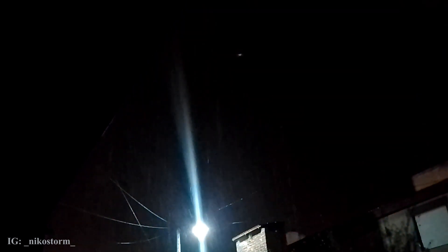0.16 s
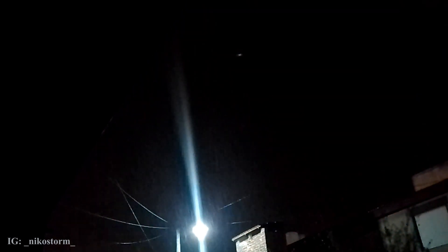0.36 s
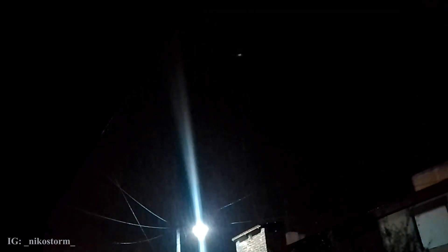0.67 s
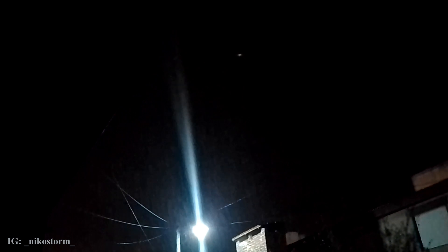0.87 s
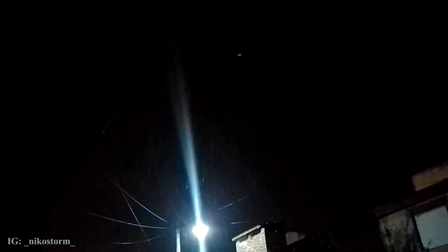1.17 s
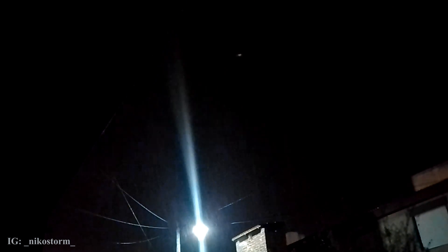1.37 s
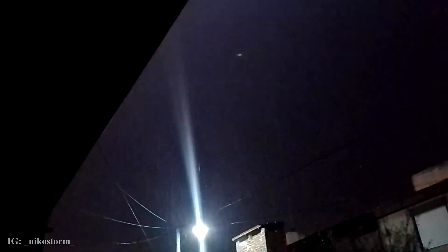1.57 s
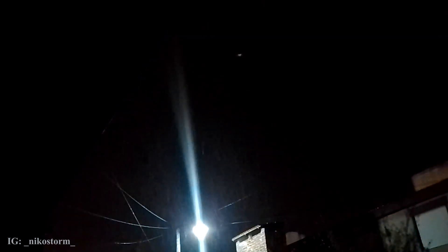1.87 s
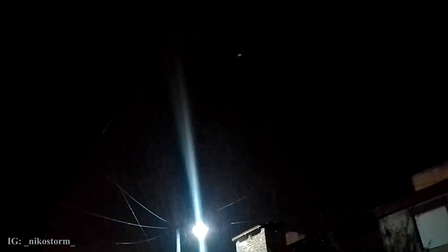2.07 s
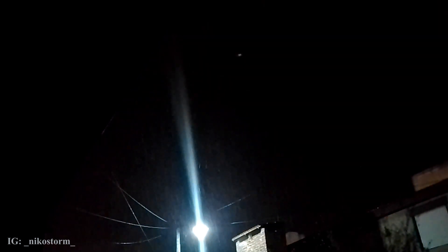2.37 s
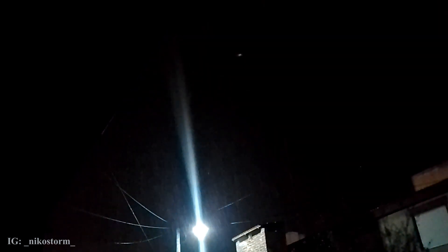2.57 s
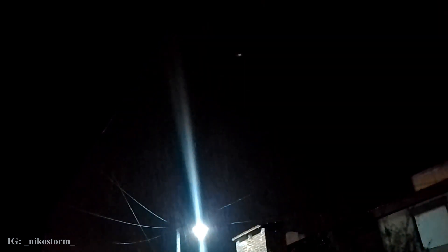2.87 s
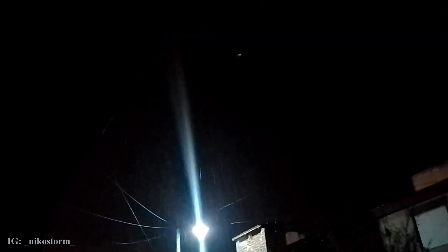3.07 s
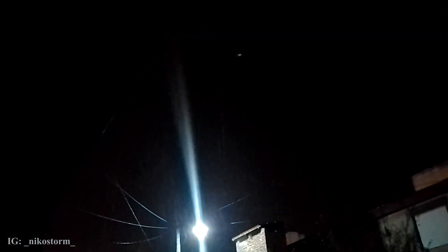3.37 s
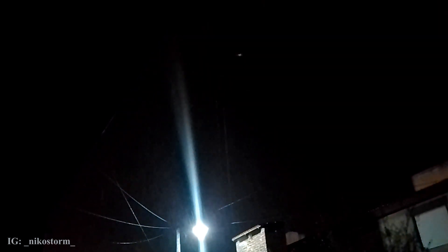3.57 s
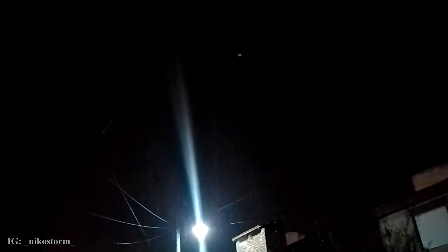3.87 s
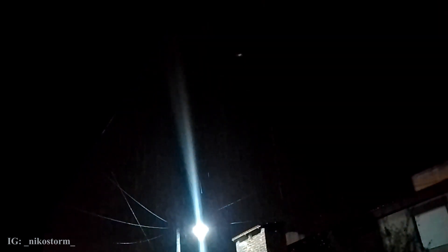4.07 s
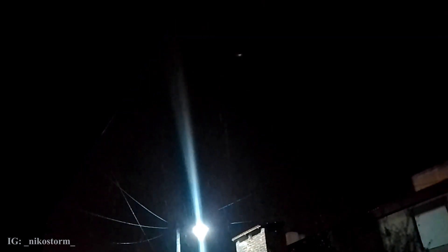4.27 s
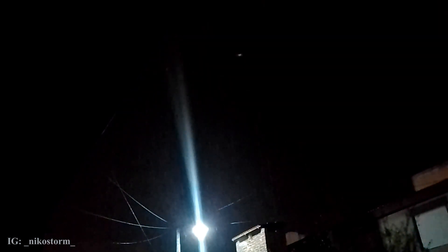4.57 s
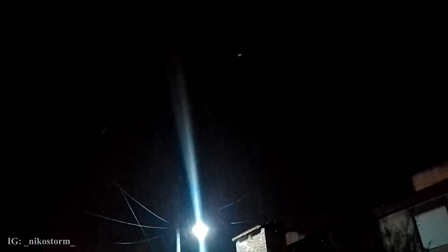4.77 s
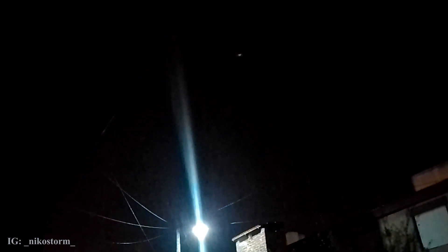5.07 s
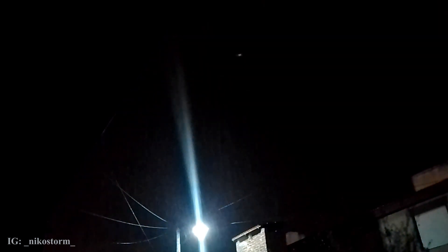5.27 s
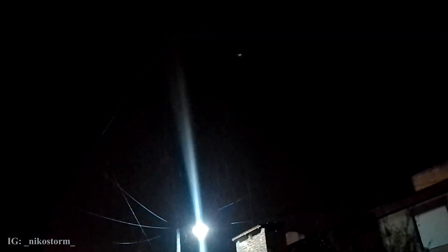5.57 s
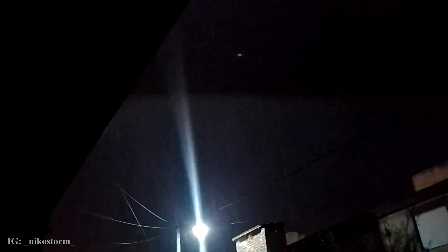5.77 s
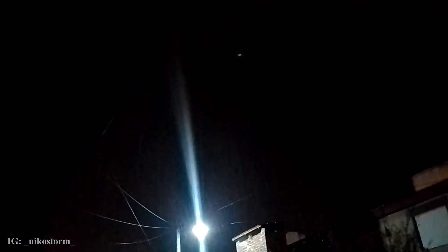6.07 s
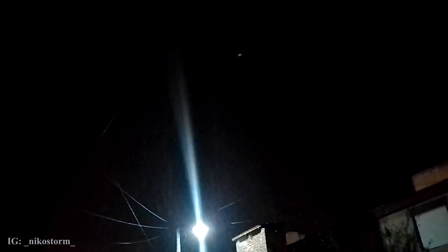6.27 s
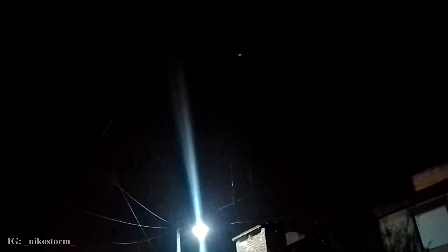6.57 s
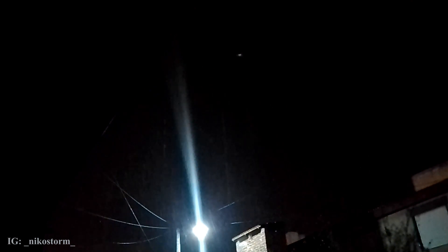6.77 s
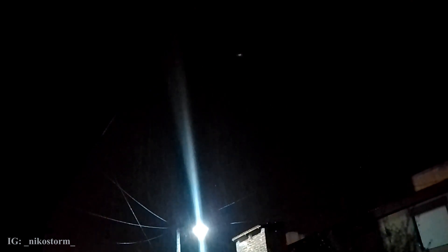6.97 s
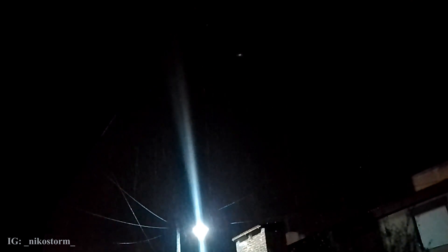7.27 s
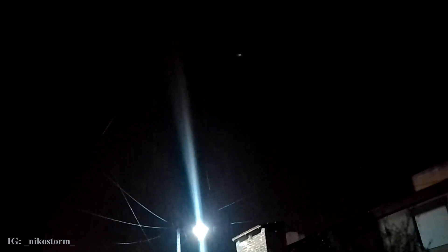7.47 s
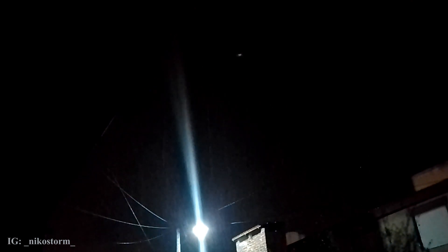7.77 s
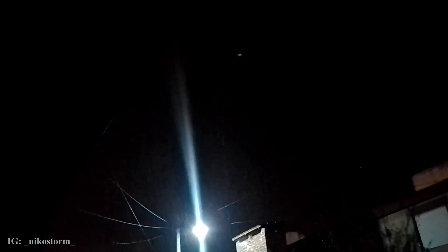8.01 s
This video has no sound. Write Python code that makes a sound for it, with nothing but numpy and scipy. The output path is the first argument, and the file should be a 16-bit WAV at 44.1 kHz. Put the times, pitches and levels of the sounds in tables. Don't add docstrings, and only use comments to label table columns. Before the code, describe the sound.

Heavy night rain between buildings. A low, dull, steady roar of distant rainfall lies under close drops that tap hollow, hard and metal surfaces. The first half second is loud and crowded with cracks, then a sudden change leaves softer rain and a thin high insect note. Patter thickens again from about four seconds and stays busy and uneven. Nearby walls add short slaps to the drops; a small microphone sits close to them under a roof edge.

```python
import sys
import numpy as np
from scipy import signal
from scipy.io import wavfile
from scipy.ndimage import uniform_filter1d

SR = 44100
rng = np.random.default_rng(int(sys.argv[2]) if len(sys.argv) > 2 else 0)


def voltage_ratio(decibels):
    exponent = np.asarray(decibels, float) / 20
    return 10 ** exponent


def pcm_store(signal):
    levels = np.round(np.clip(np.atleast_2d(signal), -1, 1) * 32767)
    wavfile.write(sys.argv[1], SR, levels.astype(np.int16).T)


N = 358974
FIRST_CHANGE_S = 0.465

# (time [s], peak [dB], ring [Hz])
HOLLOW_DROPS = [(0.1078, -17.5, 4050), (0.144, -15.5, 3900), (0.193, -12.5, 5700), (0.2423, -18, 4100),
                (0.3487, -18, 3970), (0.389, -32, 4650), (0.4532, -15.5, 3450), (1.1914, -23.5, 3600),
                (2.484, -28, 4550), (3.936, -17, 5140), (4.0053, -19, 4030), (4.0611, -21, 3930),
                (4.5316, -26, 4100), (4.9437, -17, 5430), (5.166, -25.5, 3830), (5.8067, -27.5, 4180),
                (6.111, -20, 3580), (6.2312, -23.5, 4400), (6.4609, -22, 3600), (6.8503, -24, 4700),
                (6.9306, -27, 4730), (6.9671, -20, 4204), (6.9927, -27, 4500), (7.0206, -30, 3970),
                (7.0676, -14, 4220), (7.1585, -25.5, 4460), (7.6929, -23.5, 2980), (7.7563, -25, 3960),
                (7.8007, -19, 4300), (8.0441, -24.5, 3530),
                (0.3034, -31, 3710), (0.4994, -33, 4600), (4.489, -24, 9300), (4.645, -28, 8900),
              (7.328, -32, 8460), (7.693, -25, 4600), (0.525, -31, 4480), (1.3572, -28, 5400),
              (1.5833, -31.5, 4470), (1.743, -32.5, 3920), (2.004, -31.5, 4000), (2.1321, -32, 3160),
              (3.028, -30, 4500), (3.223, -31, 3360), (3.423, -33, 4250), (3.483, -35, 3600),
              (3.6972, -33, 3880), (3.891, -29.5, 4850), (3.9759, -32, 3870), (4.742, -32.5, 4000),
              (4.8212, -35, 4000), (5.188, -28.5, 4240), (5.4918, -32, 3980), (5.6503, -33, 4830),
              (5.859, -37, 4770), (5.9711, -30, 3700), (6.202, -29, 4800), (7.032, -26, 4230),
              (7.407, -31, 3600), (7.54, -34, 4205), (7.743, -26, 4500), (7.83, -29, 4250),
              (7.88, -27, 4600)]
# (time [s], peak [dB], ring [Hz])
HARD_DROPS = [(0.0415, -19, 7550), (0.1098, -8.5, 7900), (0.3361, -17.5, 7800), (2.133, -26, 7360),
              (2.6504, -28, 7350), (2.7316, -23, 8300), (3.029, -27, 7400), (3.46, -25.5, 7550),
              (3.9755, -20.5, 7050), (4.0592, -22, 7100), (4.1933, -13, 8300), (4.2795, -16.5, 8300),
              (4.8214, -25.5, 6960), (5.167, -23.5, 7780), (5.6512, -22, 8300), (5.7144, -22, 8200),
              (5.7998, -13.5, 8130), (5.859, -24, 8300), (6.0972, -25, 8100), (6.1282, -18.5, 7650),
              (6.2373, -19, 7585), (6.3647, -21.5, 7260), (6.4612, -22, 7460), (6.8503, -19.5, 8300),
              (6.931, -21.5, 7800), (6.9546, -23, 7500), (7.0369, -22, 8050), (7.7023, -26, 8500),
              (7.8018, -25, 7290), (7.88, -20.5, 7960)]
# (time [s], peak [dB], ring [Hz])
METAL_DROPS = [(0.0596, -20, 10000), (0.1405, -15.5, 9900), (0.21, -15, 9500), (1.131, -31, 10300),
               (1.1914, -20, 8550), (1.3493, -26, 9255), (1.6576, -30, 9800), (3.121, -29, 9000),
               (3.8262, -24, 8800), (3.936, -20, 8900), (4.0053, -23, 8800), (4.225, -40, 8500),
               (4.4367, -25, 9100), (4.4756, -21.5, 9150), (4.559, -26, 8650), (4.9439, -12, 8500),
               (5.6012, -22, 8500), (5.7655, -20.5, 8500), (5.914, -22, 9050), (5.9708, -17, 8750),
               (6.5106, -23.5, 8800), (6.5896, -22, 9110), (6.6298, -26, 9200), (6.69, -21.5, 8760),
               (7.0776, -23, 8300), (7.359, -24.5, 9500), (7.3956, -21, 9700), (7.443, -24, 9900),
               (7.597, -29, 10900), (8.074, -21.5, 9390)]
# (time [s], peak [dB], ring [Hz])
SMALL_HOLLOW_DROPS = [(0.0105, -23, 4300), (0.0256, -24, 4200), (0.1595, -24, 3750), (0.2049, -15, 3830),
                      (0.2114, -23, 5600), (0.2554, -15, 4670), (0.3052, -23, 3660), (0.3876, -23, 3960),
                      (0.3921, -17.5, 4540), (0.4378, -22, 3240), (0.8298, -29.5, 4610),
                      (0.9425, -32.5, 3940), (1.4994, -33, 5450), (1.8371, -32, 4800), (2.6387, -32, 5020),
                      (2.6457, -29, 4520), (2.6516, -31, 5940), (3.4155, -31, 3450), (3.4295, -28, 4590),
                      (3.6182, -33.5, 3900), (3.6621, -34.5, 3040), (3.8445, -28, 5990),
                      (3.9773, -26, 5990), (4.1149, -27, 3790), (4.1227, -35, 3470), (4.1497, -30, 4180),
                      (4.1909, -29, 5990), (4.2326, -33, 4690), (4.4909, -33, 4500), (4.5601, -28, 5810),
                      (4.8039, -31, 4940), (5.407, -32, 4630), (5.4466, -31, 5170), (5.4563, -35, 3810),
                      (5.5116, -33, 3600), (5.5411, -37, 2610), (5.5759, -38, 4130), (5.7016, -32, 5990),
                      (5.7193, -26, 5950), (5.8647, -29, 4780), (5.8723, -32, 3620), (5.9349, -31, 4820),
                      (6.0575, -36, 4130), (6.0738, -32, 3810), (6.0985, -23, 5940), (6.1075, -28, 4480),
                      (6.1744, -29, 3530), (6.2388, -24, 4454), (6.3852, -33, 5990), (6.5119, -35, 3730),
                      (6.5991, -30.5, 4090), (6.6855, -32, 5990), (6.778, -31, 3900), (6.8953, -31, 3810),
                      (6.9557, -28.5, 4630), (7.0804, -16.5, 4700), (7.3608, -34, 3680), (7.703, -24, 2540),
                      (7.8173, -30, 4500), (7.8274, -29, 3230), ]
# (time [s], peak [dB], ring [Hz])
SMALL_HARD_DROPS = [(0.0537, -26, 7560), (0.1343, -28, 7540), (0.1454, -14, 8380), (0.1498, -17, 9320),
                    (0.1545, -21, 8870), (0.1597, -14, 7390), (0.2069, -16, 7650), (0.3051, -21, 8250),
                    (0.3327, -17, 9580), (0.3447, -18, 9090), (0.3502, -11.5, 8160), (0.392, -22, 6930),
                    (0.438, -16, 9630), (0.455, -17.5, 7300), (1.1328, -26, 9750), (1.1666, -25, 9700),
                    (1.3575, -24, 9840), (2.485, -28, 6050), (2.8607, -26, 9580), (3.6977, -23.5, 8800),
                    (3.9447, -23, 9190), (4.0188, -23, 8940), (4.1228, -22, 8760), (4.1499, -22, 7490),
                    (4.1554, -28, 8700), (4.2905, -22, 7860), (4.2956, -18, 8200), (4.3048, -20, 8960),
                    (4.663, -26, 8660), (4.7283, -23.5, 9860), (4.7429, -28, 6800), (5.0465, -18.5, 8300),
                    (5.3191, -28, 8760), (5.5115, -23, 9000), (5.7762, -23, 8200), (5.8211, -19, 9190),
                    (5.8648, -20, 9040), (6.0741, -29, 7990), (6.1178, -19, 8440), (6.1381, -28, 7750),
                    (6.153, -20, 7300), (6.2148, -24, 7560), (6.4472, -26, 9780), (6.4814, -23, 8910),
                    (6.528, -25, 9780), (6.5965, -21, 8740), (6.8948, -26, 7770), (6.9731, -22, 8420),
                    (7.0064, -20, 9000), (7.0176, -26, 8500), (7.0327, -22, 8310), (7.1246, -22, 9630),
                    (7.1858, -22, 8100), (7.5272, -26, 9260), (7.6404, -25, 9390), (7.7493, -24.5, 7560),
                    (7.7577, -20, 8140), (7.8168, -25, 7470), (8.0456, -25, 10400), (8.0849, -19, 10230)]
# (time [s], peak [dB])
SPLASH_TICKS = [(0.1401, -30), (0.1865, -28), (1.1313, -29), (1.7429, -29), (1.8457, -36), (1.961, -31),
                (2.2044, -30), (2.376, -29.5), (2.7327, -28), (3.2121, -33), (3.3898, -31), (3.5489, -22),
                (3.827, -19), (4.0612, -22), (4.1834, -32), (4.4137, -23.5), (4.974, -21.5), (5.299, -29),
                (5.4927, -25.5), (5.6004, -21.5), (6.3869, -28), (6.6298, -27), (6.6847, -25), (6.967, -21),
                (7.442, -29), (7.597, -25), (7.6271, -24), (7.8007, -26), (7.8265, -19.5), (8.0722, -21)]
# (pitch [Hz], level [dB], t60 [s])
SHEET_RINGS = [
    (3870, -21.5, 0.034),
    (4430, -23, 0.026),
    (7150, -18, 0.022),
    (7720, -15, .035),
    (8300, -18.5, 0.026),
    (8930, -14.5, 0.053),
    (9300, -15, 0.054),
]
# (delay [s], level [dB])
WALL_ECHOES = [
    (.0022, -11),
    (.0049, -11.5),
    (.0072, -20),
    (0.012, -26),
]
# (time [s], strength [dB], lean toward the hard surface [dB])
PATTER_CURVE = [(0.47, 3, -0.5), (0.7, 0.5, 1), (1.3, 0.5, 0), (2.7, 0, 0.5), (3.76, 3, 5.5), (4.08, 7, 7),
                (4.3, 4.5, 6), (4.76, 3, 4.5), (5.42, 3.5, 5), (5.9, 5, 8), (6.26, 6.5, 5.5),
                (6.49, 2.5, 4.5), (6.77, 5, 4.5), (7.1, 6.5, 7), (7.66, 1.5, 2.5), (7.72, 10.5, 0),
                (7.86, 4, 3), (8.14, -1.5, 1.5)]
# (frequency [Hz], density [dB per Hz])
PATTER_TONE = [(880, -22), (1500, -0.5), (1790, -8.5), (3060, 4), (3820, 7), (4210, -1), (4560, 3),
               (5220, 0), (8500, 2), (9840, 1), (15400, -6)]
# (usual level [dB], strength share [dB/dB], lean share [dB/dB],
# first scene level [dB], first scene drift [dB/s])
PATTER_BANDS = [
    (-57, 0.59, -0.24, -45, -46),
    (-51, 0.84, -0.98, -36, -4.5),
    (-52, 0.94, -0.26, -36.5, 2),
    (-58, 0.33, 0.33, -51, -3),
]
# (frequency [Hz], width [Hz], lift [dB])
SURFACE_MODES = [
    (2800, 250, 4),
    (3600, 83, -4),
    (4600, 210, 3.5),
    (7700, 260, 2),
    (8300, 190, 1.5),
    (9250, 150, 3.5),
]
# (start [s], end of held note [s], end of tail [s], pitch [Hz], peak [dB])
INSECT_NOTES = [
    (0.459, 0.65, 0.7, 9590, -31.5),
    (0.651, 0.72, 1.04, 9625, -37),
    (0.932, 1.044, 1.13, 9600, -37.5),
    (1.031, 1.125, 1.5, 9590, -36),
    (0.614, 0.722, 0.78, 8990, -45.5),
    (6.711, 6.815, 6.9, 10850, -36),
    (7.374, 7.468, 7.8, 10810, -33.5),
]
# (start [s], end [s], pitch [Hz], level [dB])
GUTTER_RINGS = [(1.082, 1.428, 5650, -53.5), (2.399, 2.641, 3470, -50.5), (2.401, 2.647, 4570, -55),
                (3.22, 3.322, 2650, -52.5), (3.392, 3.503, 3600, -52), (3.898, 4.678, 8930, -50),
                (4.05, 4.4, 7700, -56), (4.1, 4.663, 9250, -56), (4.93, 5.251, 9560, -50),
                (4.927, 5.247, 8050, -53), (5.55, 5.95, 8400, -51), (5.752, 6.25, 7900, -52),
                (5.598, 6.099, 9100, -55), (5.77, 6.0, 10370, -54.5), (6.045, 6.33, 9000, -49),
                (6.097, 6.344, 4490, -52), (6.277, 6.6, 7400, -52), (6.458, 6.743, 9650, -55),
                (6.8, 7.302, 8500, -49.5), (6.85, 7.252, 7760, -48), (6.872, 7.219, 4600, -47),
                (6.859, 7.253, 3710, -48), (7.06, 7.2, 2700, -52.5), (7.358, 7.754, 9250, -51),
                (7.718, 7.922, 8300, -45), (7.707, 7.89, 4500, -51), (7.711, 7.891, 3300, -46),
                (7.7, 7.863, 10310, -54)]
# (time [s], level [dB])
THUMPS = [
    (.44, -41),
    (3.429, -47),
    (6.668, -47),
    (6.7, -54),
    (4.0, -56),
]
# (time [s], level [dB], openness of the street as upper shelf [dB])
ROAR_CURVE = [(0.0, -43.5, -1), (0.46, -41.5, -5.5), (0.66, -47, -2), (1.12, -43.5, -7.5), (1.3, -44, -4.5),
              (2.7, -44.5, -4), (3.44, -46, -6), (3.58, -50, -7), (4.19, -47.5, -12), (4.48, -51.5, -11.5),
              (4.85, -48, -14), (5.72, -48, -12.5), (5.97, -56.5, -4.5), (6.2, -51, -5.5),
              (6.655, -48, -16), (6.675, -45.5, -9.5), (7.3, -47.5, -10), (8.14, -48.5, -2)]
# (frequency [Hz], density [dB per Hz])
ROAR_TONE = [(24, -67), (40, -29), (172, -25.5), (299, -6.5), (425, 1.5), (804, -2.5), (1110, -4),
             (1240, -6), (1450, -17.5), (1770, -31), (2200, -23), (2860, -45), (4840, -120)]
# (start [s], low flank [dB], street notch [dB])
STANDPOINTS = [
    (0, -11, -8),
    (.47, -12, -7),
    (3.45, -14, -5.5),
    (6.665, -13.5, -8),
]
# (start [s], end [s], level [dB])
RUMBLE_SWELLS = [(0, .75, 8), (1.2, 2.7, 7), (2.76, 2.88, -8), (2.95, 3.08, 11), (3.2, 3.36, 11),
                 (3.47, 3.9, -16), (3.93, 4.1, 18), (4.15, 4.303, 7), (4.34, 4.65, -8), (4.9, 5.5, -12),
                 (5.8, 5.98, -10), (6.72, 6.84, -6), (6.88, 7.25, 11), (7.88, 8.05, -8)]
# (start [s], end [s], frequency [Hz], level [dB])
STANDING_WAVES = [(0.5, .4, 1040, 1), (.44, 0.76, 1434, 7.5), (0.5, 1, 1340, -13), (0.9, 1.14, 200, -15),
                  (1.16, 1.7, 560, 3.5), (1.5, 2.05, 270, 3.5), (2.16, 2.46, 250, 5.5),
                  (3.0, 3.44, 1410, -6), (3.5, 3.94, 197, -11), (3.5, 4.117, 990, -9.5),
                  (3.5, 4.32, 1280, -4), (4, 4.3, 880, 8), (4, 4.12, 405, 5), (3.5, 4.12, 216, 8.5),
                  (4, 4.983, 680, -5), (4.34, 4.6, 220, -5), (4.5, 5.5, 180, -7), (4.5, 5.66, 1050, -5.5),
                  (4.5, 5.5, 426, 5), (6, 6.66, 372, -11), (6.5, 7.02, 1000, -9), (3.42, 3.6, 1200, 6),
                  (6, 5.15, 1000, -3), (6.65, 7.27, 1114, 6.5), (7, 7.418, 1100, -9), (-0.5, .72, 1340, 5),
                  (7, 7.68, 260, -5.5), (7.42, 7.68, 695, -8), (7.5, 7.78, 540, -2.5), (7.5, 8.142, 560, 3)]


def evened(x):
    return x / np.sqrt(np.mean(x ** 2) + 1e-20)


def smoothed(x, width):
    return uniform_filter1d(uniform_filter1d(x, width), width)


def read(points, hz):
    f, value = np.transpose(points)
    return np.interp(np.log(hz + 1), np.log(f + 1), value)


def follow(rows, t):
    s, *columns = np.transpose(rows)
    return [np.interp(t, s, c) for c in columns]


def add(mix, s, sound):
    part = mix[max(round(s * SR), 0):][:len(sound)]
    part += sound[:len(part)]


def resonance(hz, centre_hz, width_hz):
    return np.exp(-((hz - centre_hz) / width_hz) ** 2)


def gate(t, start, end, lead=0):
    return np.clip(np.minimum(t - start, end - t) / 0.03 + lead, 0, 1)


def shares(hz, edges_hz, soft_hz):
    steps = [1 / (1 + np.exp(np.clip((hz - edge) / soft_hz, -50, 50))) for edge in edges_hz]
    return np.diff([0 * hz, *steps, 1 + 0 * hz], axis=0)


def shaped(x, tone, field, size):
    hz, t, z = signal.stft(x, SR, nperseg=size, noverlap=size * 3 // 4)
    gain = voltage_ratio(read(tone, hz))
    bands, levels, field_db = field(hz, t)
    for band, db in zip(bands, levels):
        band_power_db = 10 * np.log10(np.mean(band * gain ** 2))
        field_db = field_db + band[:, None] * (db - band_power_db)
    return signal.istft(z * gain[:, None] * voltage_ratio(field_db), SR, nperseg=size, noverlap=size * 3 // 4)[1][:N]


def patchy(x, size, wide, long, depth_db):
    hz, t, z = signal.stft(x, SR, nperseg=size, noverlap=size * 3 // 4)
    patches = rng.standard_normal(z.shape)
    for _ in range(2):
        patches = uniform_filter1d(patches, wide, axis=0)
        patches = uniform_filter1d(patches, long, axis=1)
    return signal.istft(z * voltage_ratio(depth_db * evened(patches)), SR, nperseg=size, noverlap=size * 3 // 4)[1][:N]


def ring(hz, cycles, t):
    u = t * hz / cycles
    return np.sin(2 * np.pi * hz * t) * np.e * u * np.exp(-u)


def fuzzy(hz, t, steady, smear, waver=160):
    a, b = (evened(smoothed(v, smear)) for v in rng.standard_normal((2, len(t))))
    phase = 2 * np.pi * np.cumsum(hz + 0 * t) / SR + waver * np.cumsum(a) / SR
    tone = ((steady + a + 1j * b) * np.exp(1j * phase)).real
    return evened(tone) * signal.windows.tukey(len(t), .04)


def walls(x, wet_db, t60):
    taps = np.zeros(SR // 4)
    at = np.arange(200, len(taps) - 20, 20)
    signs = rng.choice([-1., 1.], len(at))
    taps[at + rng.integers(0, 20, len(at))] = signs * voltage_ratio(-60 * at / SR / t60)
    taps *= voltage_ratio(wet_db) / np.linalg.norm(taps)
    taps[0] = 1
    for s, db in WALL_ECHOES:
        taps[round(s * SR)] += voltage_ratio(db)
    return signal.oaconvolve(x, taps)[:N]


def splashing_drops(out, rows, cycles):
    t = np.arange(600) / SR
    for (s, db, hz), droplets in zip(rows, rng.random((len(rows), 5, 3))):
        for late, less, tone in [(0, 0, .5), *droplets]:
            if s < FIRST_CHANGE_S < s + .05 * late:
                continue
            pitch_hz = hz * (0.88 + 0.26 * tone)
            hit = ring(pitch_hz, cycles, t) + .22 * ring(pitch_hz, 1.14, t)
            softer_db = np.sign(late) * (13.0 + 6.4 * less)
            add(out, s + .0009 + 0.05 * late ** 1.5, hit * voltage_ratio(db + 2.5 - softer_db))


def near_drops():
    t, out = np.arange(600) / SR, np.zeros(N)
    splashing_drops(out, HOLLOW_DROPS, .65)
    splashing_drops(out, HARD_DROPS, 1.05)
    splashing_drops(out, METAL_DROPS, 1.15)
    for rows, cycles in (SMALL_HOLLOW_DROPS, 1.05), (SMALL_HARD_DROPS, 1.4):
        for s, db, hz in rows:
            add(out, s - cycles / hz, voltage_ratio(db - .6) * ring(hz, cycles, t))
    for s, db in SPLASH_TICKS:
        add(out, s + 0.00085, voltage_ratio(db + 6.0) * ring(9900, 0.52, t))
    out = signal.sosfilt(signal.butter(4, 1900, "high", fs=SR, output="sos"), out)
    after = np.arange(3000) / SR
    body = sum(voltage_ratio(db - 60 * after / t60) * np.sin(2 * np.pi * hz * after) for hz, db, t60 in SHEET_RINGS)
    out = out + voltage_ratio(-23.5) * signal.oaconvolve(out, body)[:N]
    first = np.arange(N) < FIRST_CHANGE_S * SR
    return first * walls(out * first, -29, 0.37) + walls(out * ~first, -10.0, 0.24)


def patter_field(hz, t):
    strength, lean = follow(PATTER_CURVE, t)
    levels = [np.where(t < FIRST_CHANGE_S, first_db + drift * t, db + a * strength + b * lean)
              for db, a, b, first_db, drift in PATTER_BANDS]
    modes_db = sum(db * resonance(hz, mode_hz, width) for mode_hz, width, db in SURFACE_MODES)
    gap_db = -8 * np.outer(resonance(hz, 6100, 200), t < FIRST_CHANGE_S)
    lean_db = 0.58 * np.outer(resonance(hz, 8500, 1350) - .5, lean * (t > FIRST_CHANGE_S))
    lean_db = lean_db * (hz > 5800)[:, None]
    return shares(hz, [2500, 5800, 11300], 99), levels, modes_db[:, None] + gap_db + lean_db


def patter():
    per_s, spread_db, smooth = 480, 6, .4
    clumps = voltage_ratio(7.1 * evened(smoothed(rng.standard_normal(N), 700)))
    size = voltage_ratio(spread_db * np.minimum(rng.exponential(1, (2, N)), 2.0))
    size = size * (rng.random((2, N)) < per_s * clumps / SR)
    kind, t, drops = rng.integers(0, 24, N), np.arange(400) / SR, np.zeros(N)
    for k, hz in enumerate(np.geomspace(2600, 15000, 24)):
        tap = ring(hz, 1.1, t)
        drops += signal.oaconvolve(size[0] * (kind == k), tap / np.linalg.norm(tap) * hz)[:N]
    ticks = np.diff(size[1] * rng.choice([-1., 1.], N), prepend=0)
    drops = evened(walls(evened(drops) + voltage_ratio(-1) * evened(ticks), -64, 0.13))
    spray = evened(patchy(rng.standard_normal(N), 512, 2, 70, 2.2))
    mix = np.sqrt(1 - smooth) * drops + np.sqrt(smooth) * spray
    return voltage_ratio(1.1) * shaped(mix, PATTER_TONE, patter_field, size=256)


def gutter_trickles():
    out = np.zeros(N)
    for start, end, hz, db in GUTTER_RINGS:
        t = np.arange(start, end, 1 / SR)
        spurts = voltage_ratio(2.0 * evened(smoothed(rng.standard_normal(len(t)), 500)))
        tone = fuzzy(hz, t, 0.27, smear=210 if hz < 6000 else 150)
        add(out, start, voltage_ratio(db - 0.5) * spurts * tone * np.sqrt(np.hanning(len(t))))
    return out


def insect():
    rise_s, stop_s, swell_db, sag_hz_per_s = 0.032, 0.031, 5, 600
    tail_db, tail_fade_db = -8.5, -14
    out = np.zeros(N)
    for start, stop, end, hz, db in INSECT_NOTES:
        t = np.arange(start, end, 1 / SR)
        held = np.clip((t - start) / (stop - start), 0, 1)
        shut = np.clip((t - stop) / stop_s, 0, 1)
        fade = np.clip((t - stop) / (end - stop), 0, 1)
        pitch_hz = hz - sag_hz_per_s * held * (stop - start)
        note = (1 - shut) * voltage_ratio(swell_db * (held - 1)) * fuzzy(pitch_hz, t, 2.2, smear=260, waver=79)
        tail = held * voltage_ratio(tail_db + tail_fade_db * fade) * fuzzy(pitch_hz + 15, t, 0.34, smear=250)
        add(out, start, voltage_ratio(db) * np.minimum((t - start) / rise_s, 1) * (note + tail))
    return out


def change_thumps():
    t, out = np.arange(1500) / SR, np.zeros(N)
    for s, db in THUMPS:
        add(out, s, voltage_ratio(db) * np.exp(-t / 0.0021) * (1 - np.exp(-t / 0.00074)))
    return out


def roar_field(hz, t):
    db, shelf = follow(ROAR_CURVE, t)
    starts, *standpoint = np.transpose(STANDPOINTS)
    flank, notch = np.array(standpoint)[:, np.maximum(np.searchsorted(starts, t) - 1, 0)]
    opened = shelf + 5.5
    flank = flank + 0.33 * opened
    notch = notch + 0.63 * opened
    bass = db + 1.9 * (flank + 12) - 32.0
    levels = [0 * t - 86, bass, db + flank, db + 0.084, db + (shelf + notch) / 2 - .2, db + notch, db + shelf]
    waves_db = sum(wave_db * np.outer(resonance(hz, wave_hz, 85), gate(t, a, b))
                   for a, b, wave_hz, wave_db in STANDING_WAVES)
    swells_db = sum(swell_db * gate(t, a, b, lead=.5) for a, b, swell_db in RUMBLE_SWELLS)
    rumble_db = np.outer(resonance(hz, 113, 32), swells_db)
    return shares(hz, [65, 185, 320, 750, 900, 1070], 32.0), levels, waves_db + rumble_db


def roar():
    noise = patchy(rng.standard_normal(N), 2048, 5, 22, 1.5)
    return voltage_ratio(3.0) * shaped(noise, ROAR_TONE, roar_field, size=2048)


def scene():
    return (near_drops() + patter() + gutter_trickles() + insect() + change_thumps() + roar())[None]


def roll_off(x):
    return signal.sosfilt(signal.butter(12, 16660, fs=SR, output="sos"), x)


def record(dry):
    low_pass = signal.firwin(255, 15720, window=("kaiser", 9), fs=SR)
    limited = signal.oaconvolve(dry, low_pass[None], "same")
    return roll_off(limited)


dry = scene()
out = record(dry)
pcm_store(out)
```